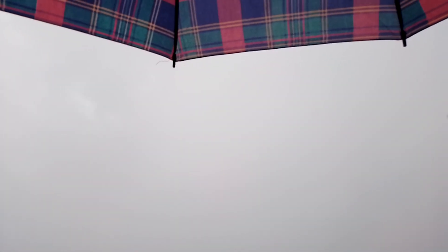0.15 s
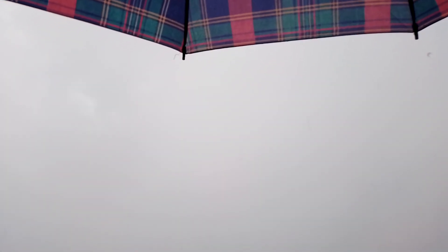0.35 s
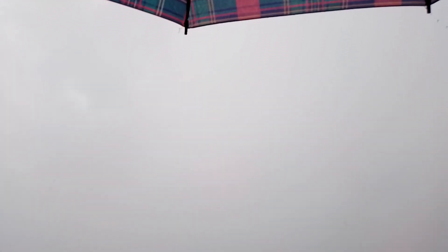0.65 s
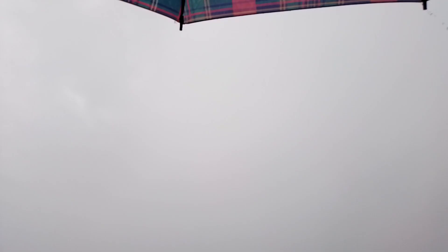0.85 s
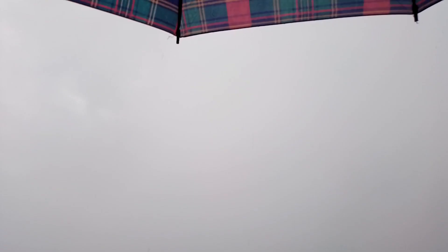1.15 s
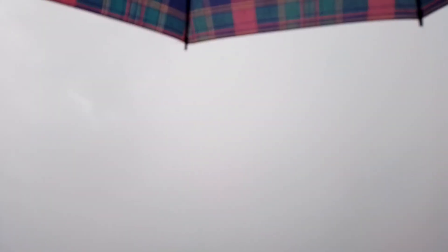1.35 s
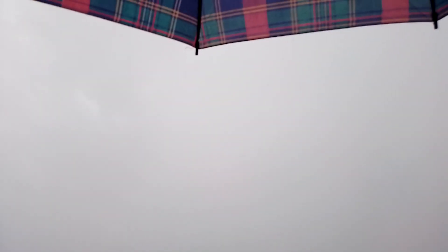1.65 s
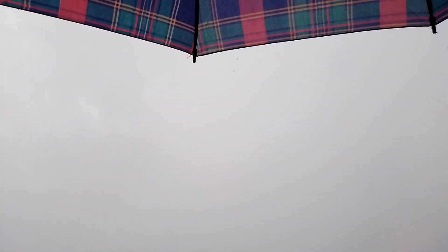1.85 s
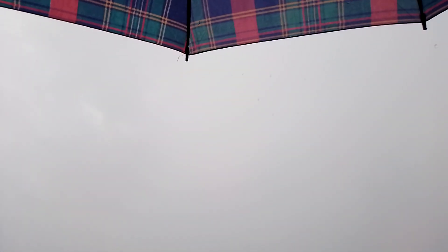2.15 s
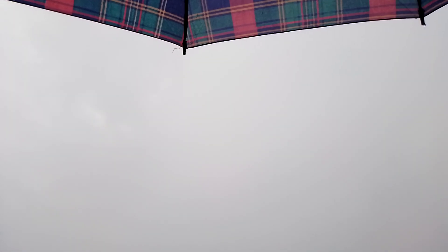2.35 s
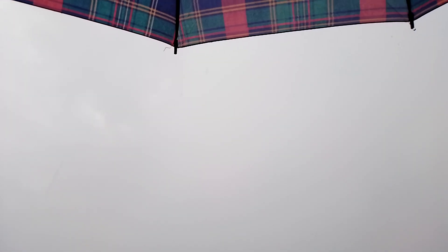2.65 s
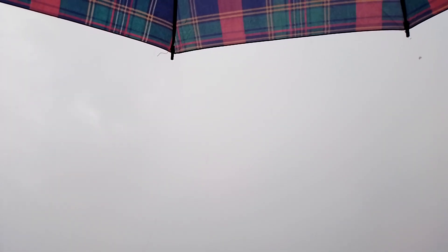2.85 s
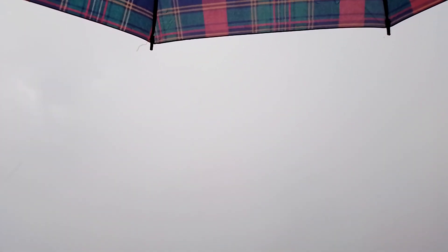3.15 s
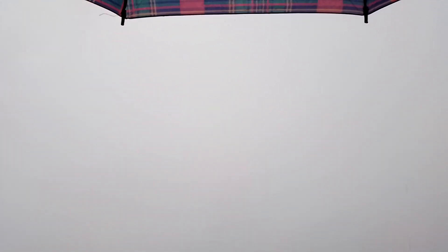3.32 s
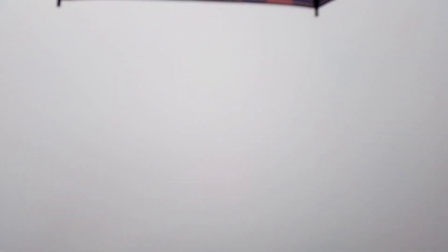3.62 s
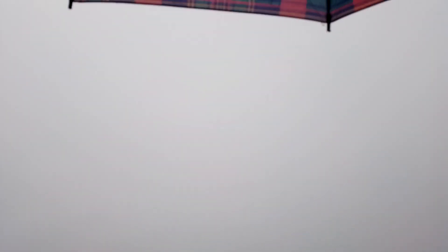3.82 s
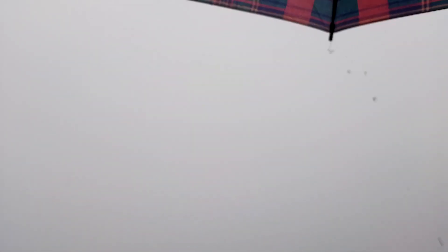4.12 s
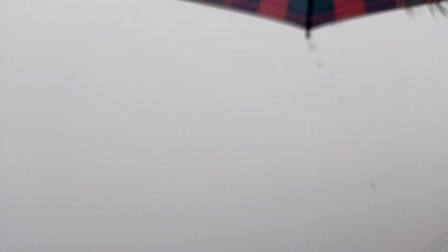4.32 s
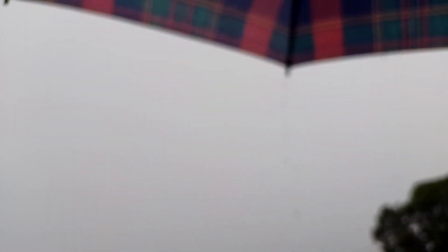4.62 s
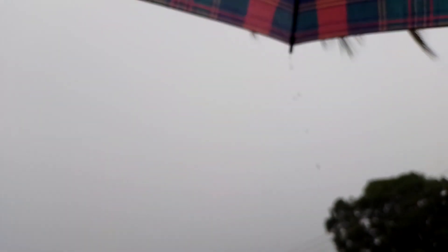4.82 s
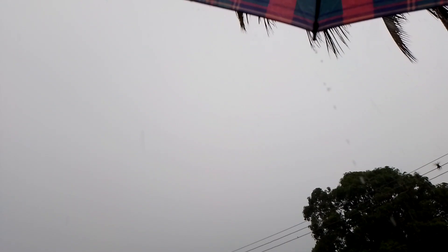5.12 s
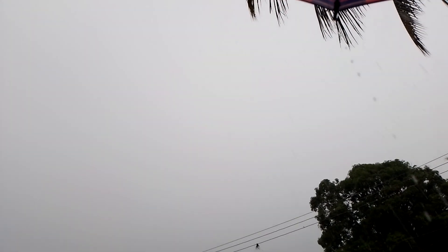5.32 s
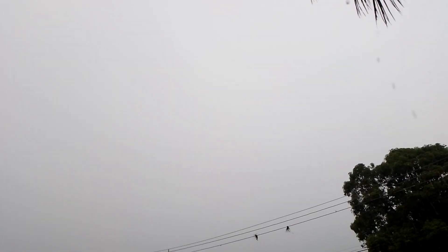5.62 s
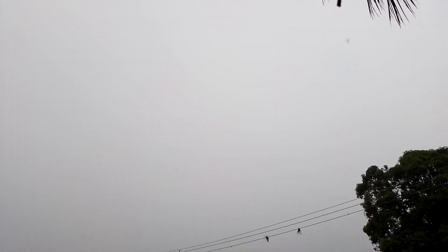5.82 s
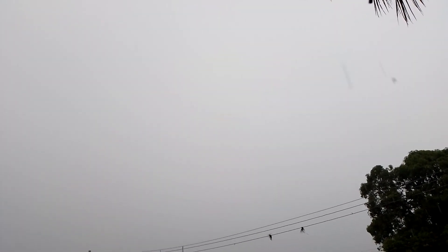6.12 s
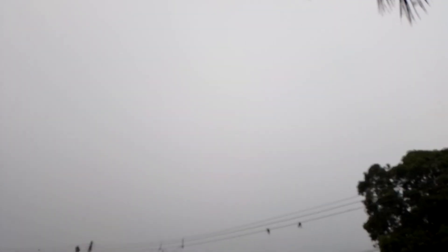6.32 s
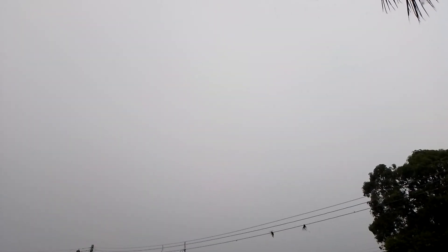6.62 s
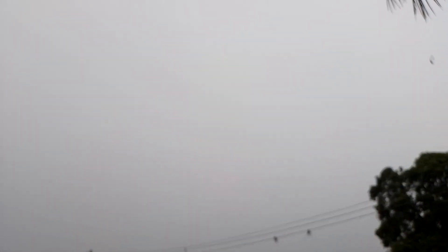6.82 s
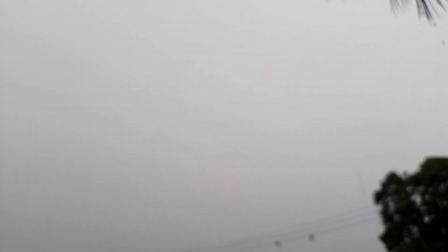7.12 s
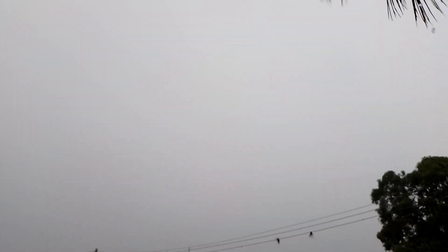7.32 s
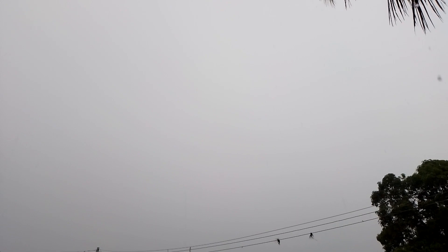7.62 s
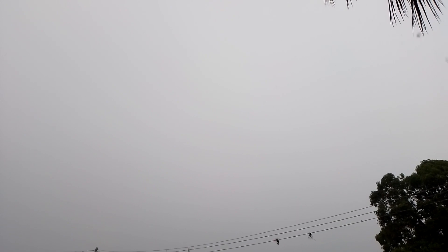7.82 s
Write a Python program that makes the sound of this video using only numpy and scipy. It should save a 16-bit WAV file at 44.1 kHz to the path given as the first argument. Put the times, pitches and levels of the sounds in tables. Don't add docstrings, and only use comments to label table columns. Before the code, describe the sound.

Steady downpour heard from beneath an umbrella: bright, dense spray hiss, quick muffled taps on taut cloth, and scattered crisp ticks nearby.

```python
import sys
import numpy as np
from scipy import signal
from scipy.fft import rfft, irfft
from scipy.io import wavfile
from scipy.ndimage import uniform_filter1d

SR = 44100
rng = np.random.default_rng(int(sys.argv[2]) if len(sys.argv) > 2 else 0)


def file_out(sig):
    cols = np.atleast_2d(sig).T
    lim = np.clip(cols, -1, 1)
    pcm = np.round(lim * 32767).astype(np.int16)
    wavfile.write(sys.argv[1], SR, pcm)


def gain_from_db(level_db):
    decades = np.asarray(level_db, float) / 20
    return 10 ** decades


N = 351036

# (time [s], left level [dB], right level [dB])
RAIN = [(0.0, -35.5, -36.5), (0.51, -34, -36), (0.53, -35.5, -37), (2.22, -35, -36.5), (2.81, -35, -36.5),
        (2.9, -35.5, -37), (3.55, -35, -36), (3.57, -36.5, -37.5), (3.97, -35.5, -36), (4.01, -35, -38),
        (4.3, -37, -37.5), (5.76, -37, -37.5), (7.78, -37, -37.5), (7.96, -36, -38)]
# (frequency [Hz], left level [dB], right level [dB])
PATTER_COLOUR = [(159, -27, -27.5), (235, -10, -8.5), (348, -5, -2.5), (508, -2, 1.1), (987, 2.5, 2.7),
                 (1270, 5, -0.2), (1763, 5.5, 0.1), (1917, 3.2, 3.1), (2660, -4, -1), (3240, -3.5, -0.5),
                 (5900, -3.5, -6.5), (8870, -3, -7), (11600, -16, -4.5), (14500, -14.5, -14.5)]
# (time [s], drumming level [dB], tightness of nearest cloth as brightness [dB])
CANOPY = [(0, -50, 8.5), (.55, -51, 4.5), (1.05, -53.5, 6), (1.55, -56.5, 6.5), (1.95, -51, 4.5),
          (2.5, -49.5, 2), (2.95, -46.5, 3.5), (3.25, -53, 4), (3.6, -50.5, 2), (4.05, -52, 0.5),
          (4.55, -47.5, 2), (5.4, -56, 1), (5.47, -48.5, 4), (6.25, -51, 1), (6.55, -48, -1.5),
          (7.35, -55.5, 4), (7.55, -46.5, 0.5), (7.96, -52, 6.5)]
# (time [s], peak [dB], pitch [Hz])
HEAVY_THUDS = [(0.048, -32, 851), (0.57, -29.5, 1100), (1.679, -28.5, 536), (2.259, -40, 789),
               (2.359, -29.5, 861), (2.605, -27, 447), (2.746, -49, 980), (2.858, -35, 980),
               (3.357, -33, 1100), (3.468, -24, 888), (3.616, -29.5, 630), (3.705, -30, 418),
               (3.745, -29, 374), (3.903, -28, 495), (3.967, -26, 514), (4.108, -25, 476),
               (4.481, -28.5, 400), (4.535, -29, 780), (4.956, -29, 805), (5.13, -27.5, 406),
               (5.433, -27, 716), (5.834, -34.5, 794), (5.948, -31, 396), (6.029, -25.5, 680),
               (6.768, -32, 541), (6.944, -27.5, 675), (7.193, -25, 650), (7.526, -24.5, 620),
               (7.655, -28.5, 740), (7.7, -28, 674)]
# (time [s], peak [dB])
SPLASHES = [(0.0488, -48), (0.1545, -27), (0.3666, -49), (0.4115, -57), (0.5452, -32), (1.4037, -51),
            (1.8706, -37), (2.034, -36), (2.0887, -36), (2.6196, -29), (2.7935, -48), (3.171, -63),
            (3.469, -49), (3.6564, -32), (3.7474, -51), (3.768, -31.5), (3.8975, -28), (4.1081, -24.5),
            (4.5456, -50), (4.7381, -35), (4.8828, -31), (5.333, -43), (5.434, -45.5), (5.681, -26),
            (5.9523, -28), (6.9728, -27.5), (7.0194, -30), (7.053, -31), (7.3348, -28.5), (7.5138, -27)]
# (time [s], peak [dB], left over right [dB])
SPITS = [(0.6674, -55, -8.0), (1.4037, -38, -10), (1.6686, -41, -10.5), (2.1326, -43, -10),
         (2.392, -48, -8.5), (2.6204, -36, -5), (2.7132, -38, -9.5), (3.3852, -44, -9), (3.469, -35, -7.0),
         (3.703, -55, -10.0), (5.244, -27.5, -17), (5.678, -39, -9.0), (6.5041, -34.5, -8),
         (6.7501, -48, -11)]
# (time [s], level [dB], left over right [dB])
WIND = [
    (0.0, -80, 5),
    (0.11, -82.5, -4),
    (1.42, -77, -4),
    (1.51, -96, -10),
    (2.08, -81, 6),
    (2.24, -71, 12),
    (2.61, -105, 1),
    (2.75, -87, 1),
    (7.8, -79, -6),
    (7.96, -81, 7.0),
]
# (frequency [Hz], width [Hz], level [dB])
PORTS = [
    (7278, 1006, 16),
    (10393, 900, 20),
]
# (frequency [Hz], left [dB], right [dB])
GATE_THRESHOLD = [(202, -9.5, -9.5), (470, -7.5, -7.5), (1000, -8, -5.5), (1490, -8, -11),
                  (1678, -10.5, -4.5), (2010, -5, -1.5), (4060, 1.5, -14.5), (6100, -8.5, 13),
                  (9300, -5, -10.5), (12000, -27, -7)]
# (side [0 left, 1 right], from [Hz], to [Hz], share of tightness [ratio])
LEAN_BANDS = [
    (0, 450, 1050, -.3),
    (0, 1100, 1900, 1.1),
    (1, 300, 650, -.9),
    (1, 650, 1300, .4),
]

LEFT_RIGHT = np.array([[.5], [-.5]])
MIC_LAG_S = .00045
LESSER_THUDS = 130
LESSER_OVER_DB, LESSER_SPREAD_DB, LESSER_FOLLOW = 16.5, 3, 0.79
CLOTH_HZ, CLOTH_SPREAD_OCT, TIGHT_OCT_PER_DB = 648, 0.81, .04
PAN_DB_PER_OCT, PAN_SCATTER_DB = 3.5, 1.8
THUD_LOW_CUT_HZ, THUD_LEFT_LATE_S = 301, 0.00016
SPLASH_CUT_HZ, SPIT_CUT_HZ = 5000, 6000
GATE_DEPTH_DB, GATE_SOFT_DB, GATE_STICKY_DB = 12.5, 0.23, 2.5
TREBLE_HZ, STICKY_TREBLE_SHARE = 3500, 0.28
HIT_TREBLE, HIT_BASS = 0.082, 0.37
HARDER_TREBLE, HARDER_BASS = 2, 0.89
LEAN_PER_DRUM_DB, LEAN_PER_TIGHT_DB = 1.5, 1.8
LEAN_WANDER_DB, LEAN_WANDER_HZ = -1, 0.87
OVERLOAD = .3


def rms_one(x):
    return x / np.sqrt(np.mean(x ** 2) + 1e-20)


def columns(rows, at, scale=np.asarray):
    key, *rest = np.transpose(rows)
    return np.array([np.interp(scale(at), scale(key), c) for c in rest])


def smooth(x, keep):
    keep = np.clip(keep, 0, .9999)
    return signal.lfilter([1 - keep], [1, -keep], x)


def drift(rate_hz):
    keep = np.exp(-2 * np.pi * rate_hz / SR)
    noise = rng.standard_normal(N + SR)
    return rms_one(smooth(smooth(noise, keep), keep)[SR:])


def filtered(x, order, hz, kind):
    return signal.sosfilt(signal.butter(order, hz, kind, fs=SR, output="sos"), x)


def patter():
    spray = rng.standard_normal((2, N)) * gain_from_db(1.25 * drift(57) + 0.75 * drift(11))
    splashes = drops(3000, spread_db=2.5, clump_db=2, count=2)
    panels = drops(500, spread_db=4, clump_db=3.5, count=8)
    panel_hz = np.geomspace(420, 1750, 8)
    drummed = sum(ring(p, hz, cycles=2.6) for p, hz in zip(panels, panel_hz))
    clicks = rms_one(splashes[0] - splashes[1])
    return gain_from_db(-3) * spray + gain_from_db(-2.5) * clicks + gain_from_db(-9.5) * rms_one(drummed)


def drops(per_s, spread_db, clump_db, count):
    when, size, side, track = rng.random((4, N))
    at = np.flatnonzero(when < per_s * gain_from_db(clump_db * drift(25)) / SR)
    height = gain_from_db(spread_db * np.minimum(-np.log(size[at]), 5.5))
    lag = (side[at] - .5) * MIC_LAG_S * SR
    track = (track[at] * count).astype(int)
    out = np.zeros((count, 2, N))
    for ear, sign in enumerate((1, -1)):
        arrival = np.clip(np.round(at + sign * lag).astype(int), 0, N - 1)
        np.add.at(out, (track, ear, arrival), height)
    return out


def ring(x, hz, cycles):
    r = gain_from_db(-60 * hz / (cycles * SR))
    w = 2 * np.pi * hz / SR
    return signal.lfilter([0, np.sin(w)], [1, -2 * r * np.cos(w), r * r], x + 1e-18)


def thuds():
    size = 2048
    out, t = np.zeros((2, N + size)), np.arange(size) / SR
    slap = 3.2 * np.sin(np.pi * np.minimum(t / .00028, 1))
    rows = all_thuds()
    for (s, db, hz, pan_db), (over, echo) in zip(rows, rng.random((len(rows), 2))):
        overtone_hz = hz * (2.36 + 0.75 * over)
        tone = np.sin(2 * np.pi * hz * t) + 0.35 * np.sin(2 * np.pi * overtone_hz * t)
        blow = tone * gain_from_db(-60 * t * hz / 4.95) + slap
        late = round((0.00223 + 0.00227 * echo) * SR)
        blow[late:] += 0.53 * blow[:-late]
        i = round((s + 0.00162) * SR)
        out[:, i:i + size] += gain_from_db(db - 1 + 0.8 * LEFT_RIGHT * pan_db) * blow
    heavy = filtered(out[:, :N], 5, THUD_LOW_CUT_HZ, "high")
    heavy[0] = np.roll(heavy[0], round(THUD_LEFT_LATE_S * SR))
    return heavy


def all_thuds():
    late, size, pitch = rng.random((LESSER_THUDS, 3)).T
    s = (np.arange(LESSER_THUDS) + late) / LESSER_THUDS * N / SR
    drum_db, tight = columns(CANOPY, s)
    mean_db = drum_db.mean()
    db = mean_db + LESSER_FOLLOW * (drum_db - mean_db) + LESSER_OVER_DB
    db += LESSER_SPREAD_DB * (2 * size - 1)
    octaves = CLOTH_SPREAD_OCT * (2 * pitch - 1) + TIGHT_OCT_PER_DB * (tight - tight.mean())
    s, db, hz = np.hstack([np.transpose(HEAVY_THUDS)[:3], [s, db, CLOTH_HZ * 2 ** octaves]])
    pan_db = PAN_DB_PER_OCT * np.log2(hz / CLOTH_HZ) + PAN_SCATTER_DB * rng.standard_normal(len(s))
    return np.transpose([s, db, hz, pan_db])


def ticks():
    full = filtered(burst(SPLASHES, t60_s=.0061, lift_db=44.5), 1, SPLASH_CUT_HZ, "low")
    bright = filtered(burst(SPITS, t60_s=.0018, lift_db=44), 2, SPIT_CUT_HZ, "high")
    return full + bright


def burst(table, t60_s, lift_db):
    size = 256
    out, fade = np.zeros((2, N + size)), gain_from_db(-60 * np.arange(size) / SR / t60_s)
    for s, db, *pan_db in table:
        noise = rng.standard_normal((2, size))
        i = round((s + .0008) * SR)
        out[:, i:i + size] += gain_from_db(db + lift_db + LEFT_RIGHT * sum(pan_db)) * noise * fade
    return out[:, :N]


def wind():
    level_db, pan_db = columns(WIND, np.arange(N) / SR)
    shared, left, right = filtered(rng.standard_normal((3, N)), 3, [35, 125], "band")
    rumble = rms_one(1.5 * shared + np.array([left, right]))
    return gain_from_db(level_db - 9.5 + 8 * drift(8.1) + pan_db * LEFT_RIGHT) * rumble


def scene():
    level = gain_from_db(columns(RAIN, np.arange(N) / SR) + 35.5)
    hz = np.maximum(np.fft.rfftfreq(N, 1 / SR), 1)
    colour = gain_from_db(columns(PATTER_COLOUR, hz, np.log) - 31.5)
    fine = irfft(rfft(level * patter() + ticks()) * colour, N)
    return fine + thuds() + gain_from_db(GATE_DEPTH_DB) * wind()


def ports(x):
    out = []
    for side, (hz, width_hz, db) in zip(x, PORTS):
        r = np.exp(-np.pi * width_hz / SR)
        poles = [1, -2 * r * np.cos(2 * np.pi * hz / SR), r * r]
        peak = signal.lfilter([(1 - r * r) / 2, 0, (r * r - 1) / 2], poles, side)
        out.append(side + gain_from_db(db) * peak)
    return np.array(out)


def gate(x):
    hz, s, z = signal.stft(x, SR, nperseg=512, noverlap=384)
    treble = hz > TREBLE_HZ
    power = uniform_filter1d(abs(z) ** 2, size=3, axis=1) + 1e-14
    start = 0.932 ** np.arange(1, len(s) + 1) * power.mean(-1, keepdims=True)
    slow_db = 10 * np.log10(smooth(power, 0.95) + start)
    top_db = 10 * np.log10(power.mean(-1).max(-1))[:, None, None]
    over_db = slow_db - top_db - columns(GATE_THRESHOLD, np.maximum(hz, 1), np.log)[..., None]

    noise = rng.standard_normal((2, len(hz), len(s) + 400))
    linger = rms_one(smooth(smooth(noise, 0.98), 0.71)[..., 400:])
    over_db += GATE_STICKY_DB * np.where(treble, STICKY_TREBLE_SHARE, 1)[:, None] * linger

    hit_db = 10 * np.log10(smooth(power.mean(0)[8:60].mean(0), 0.8))
    hit_db = np.maximum(hit_db - uniform_filter1d(hit_db, size=60), 0)
    over_db += np.where(treble, HIT_TREBLE, HIT_BASS)[:, None] * hit_db

    rain_db = columns(RAIN, s)
    harder_db = uniform_filter1d(rain_db - rain_db.mean(-1, keepdims=True), size=350)[:, None]
    over_db += np.where(treble, HARDER_TREBLE, HARDER_BASS)[:, None] * harder_db

    for (side, low, high, _), lean_db in zip(LEAN_BANDS, leaning(s)):
        over_db[side, (hz > low) & (hz < high)] += 0.62 * lean_db
    opening = np.exp(np.clip(over_db / GATE_SOFT_DB, -30, 30))
    gain = gain_from_db(-GATE_DEPTH_DB / (1.5 + opening))
    return signal.istft(z * gain, SR, nperseg=512, noverlap=384)[1][:, :N]


def leaning(s):
    drum_db, tight = columns(CANOPY, s)
    drum_lean = LEAN_PER_DRUM_DB * (drum_db - drum_db.mean())
    tight_lean = LEAN_PER_TIGHT_DB * (tight - tight.mean())
    at = np.minimum(s * SR, N - 1).astype(int)
    return [drum_lean + share * tight_lean + LEAN_WANDER_DB * drift(LEAN_WANDER_HZ)[at]
            for *_, share in LEAN_BANDS]


def roll_off(x):
    return signal.sosfilt(signal.butter(12, 14260, fs=SR, output="sos"), x)


def record(dry):
    gated = gate(ports(dry))
    mix = OVERLOAD * np.tanh(gated / OVERLOAD)
    return roll_off(mix)


dry = scene()
out = record(dry)
file_out(out)
```